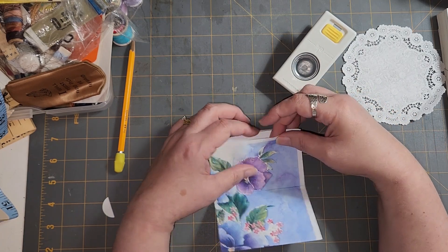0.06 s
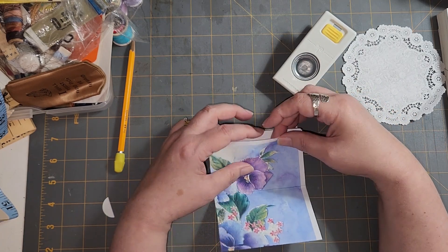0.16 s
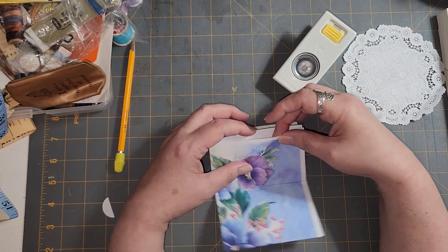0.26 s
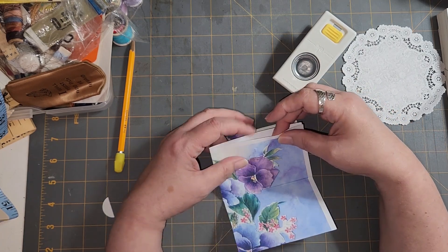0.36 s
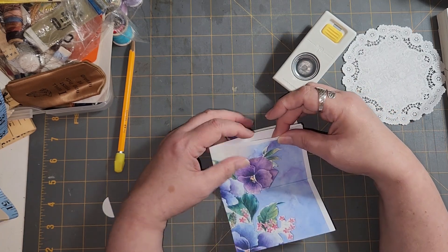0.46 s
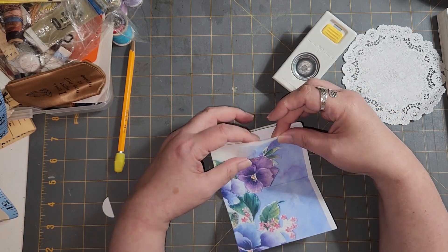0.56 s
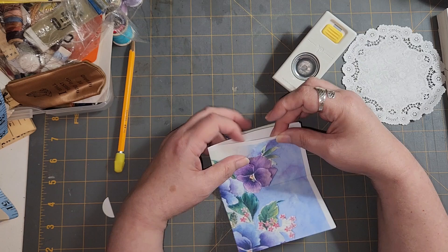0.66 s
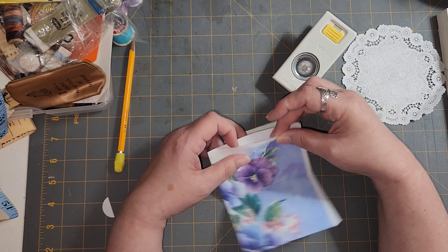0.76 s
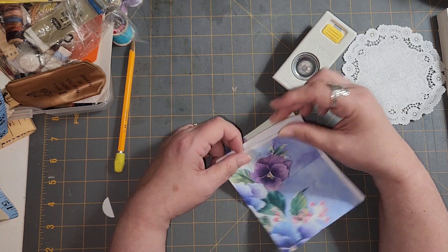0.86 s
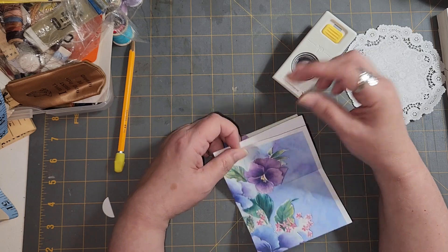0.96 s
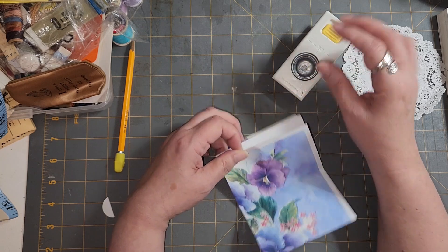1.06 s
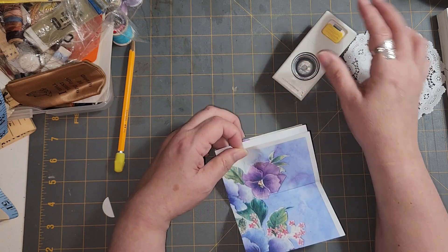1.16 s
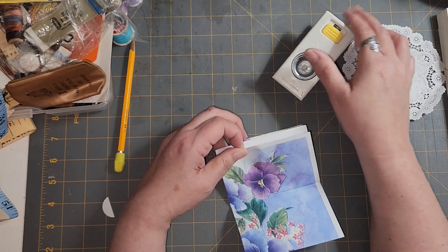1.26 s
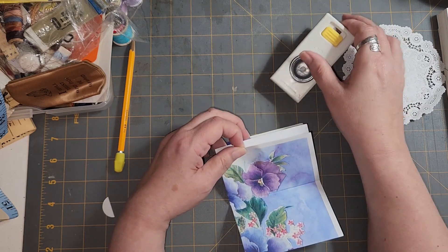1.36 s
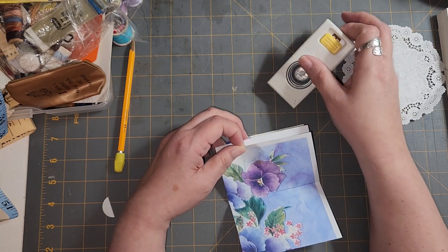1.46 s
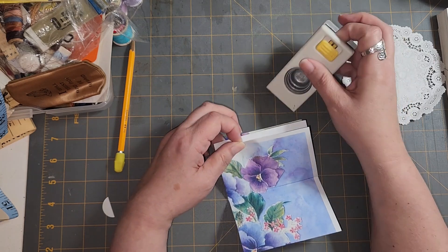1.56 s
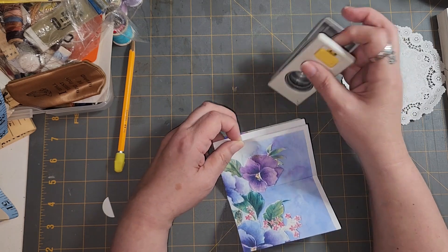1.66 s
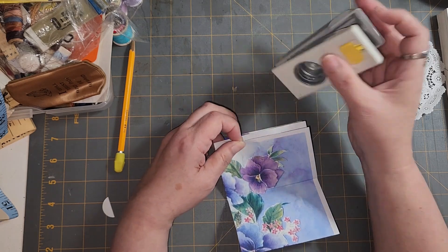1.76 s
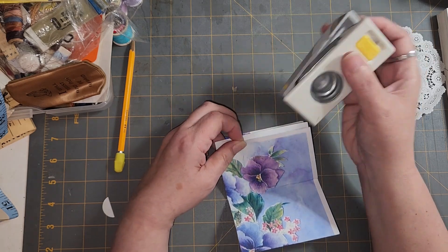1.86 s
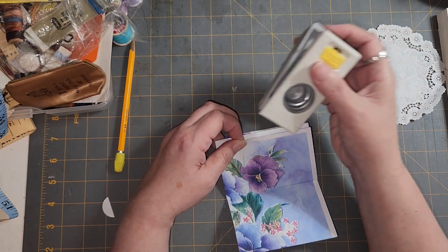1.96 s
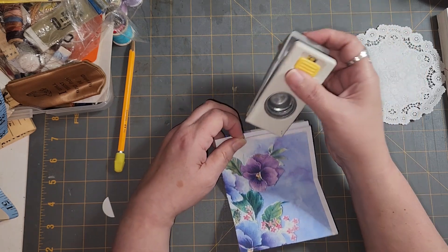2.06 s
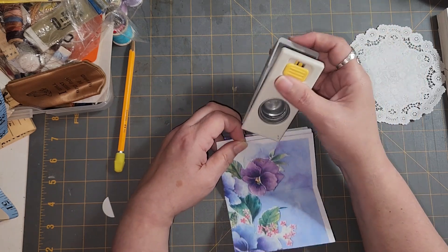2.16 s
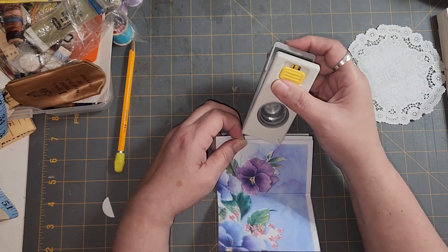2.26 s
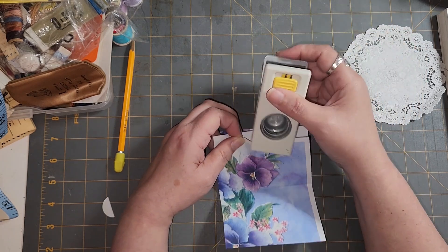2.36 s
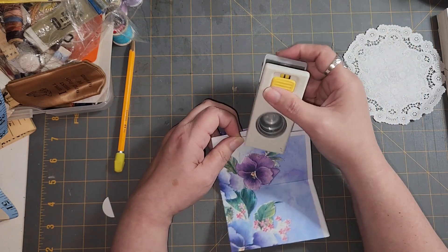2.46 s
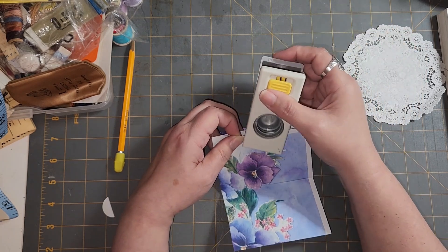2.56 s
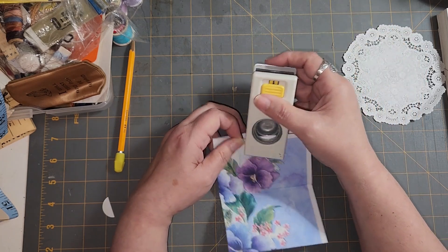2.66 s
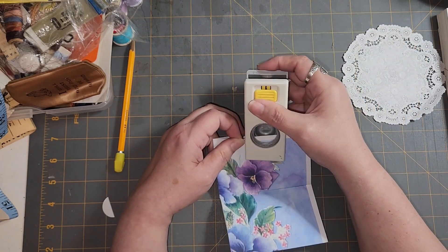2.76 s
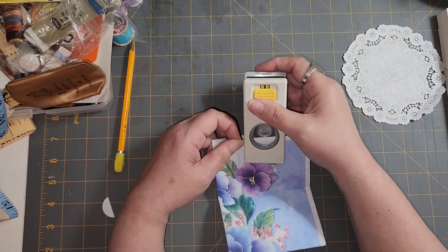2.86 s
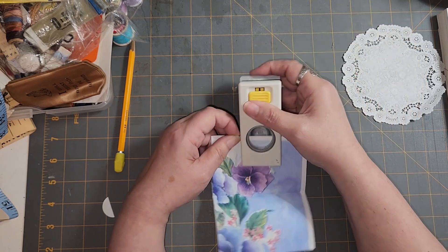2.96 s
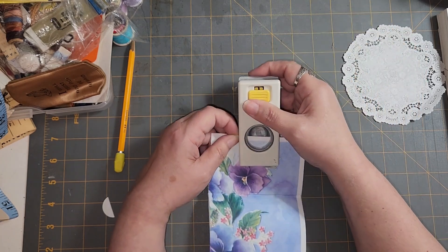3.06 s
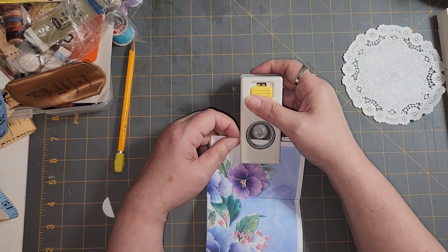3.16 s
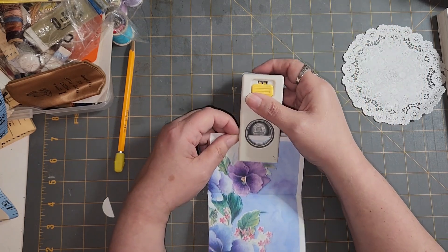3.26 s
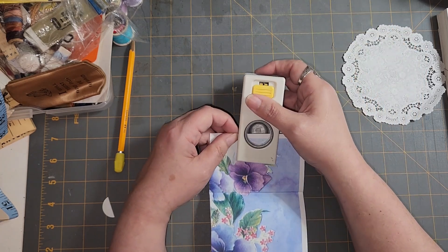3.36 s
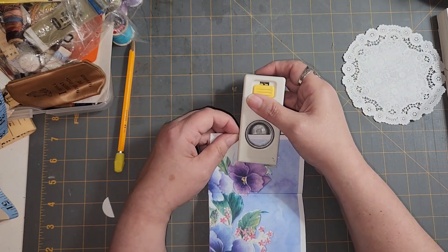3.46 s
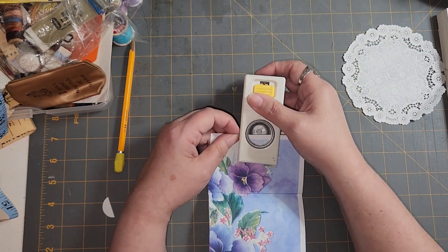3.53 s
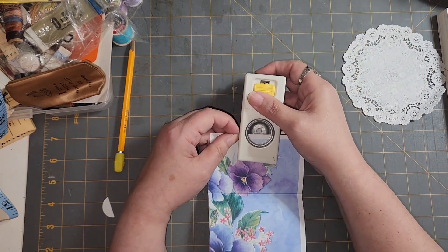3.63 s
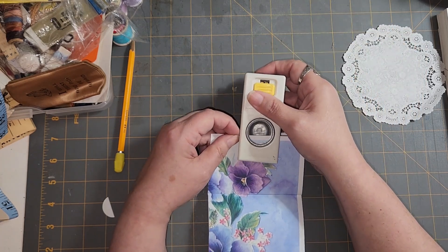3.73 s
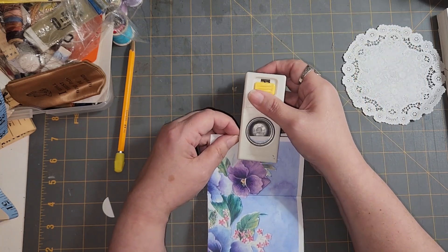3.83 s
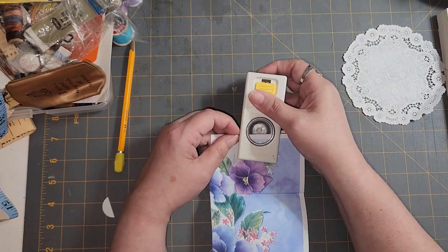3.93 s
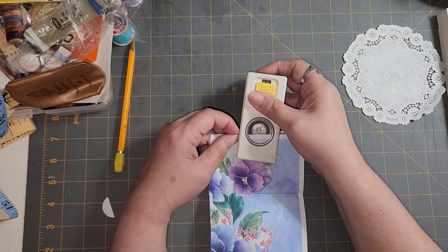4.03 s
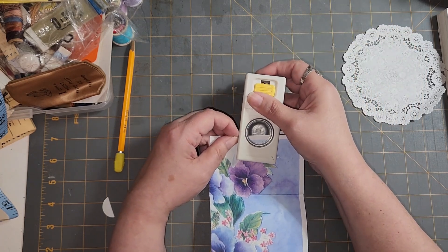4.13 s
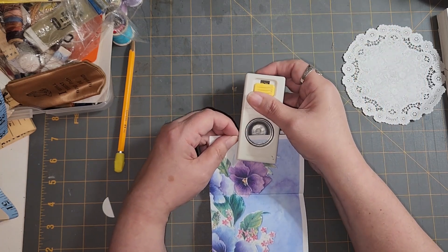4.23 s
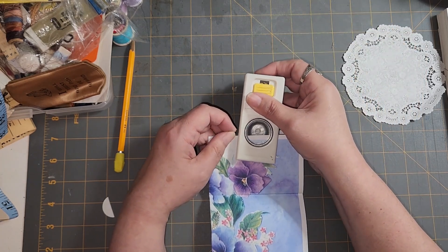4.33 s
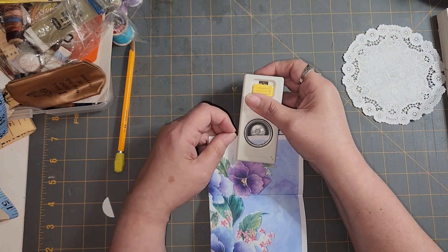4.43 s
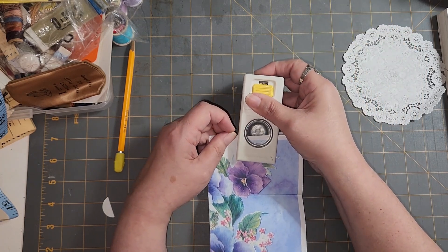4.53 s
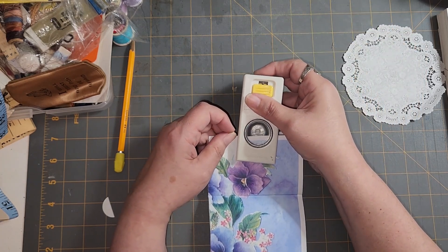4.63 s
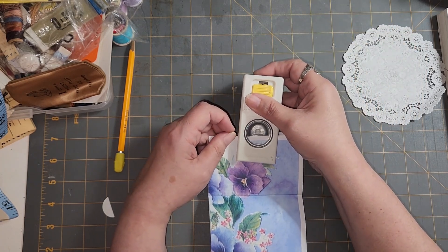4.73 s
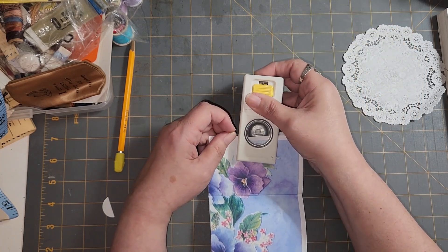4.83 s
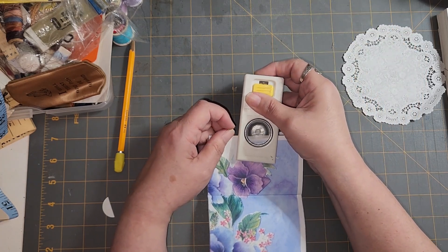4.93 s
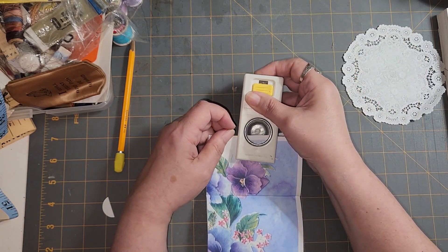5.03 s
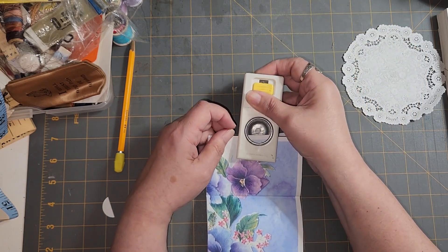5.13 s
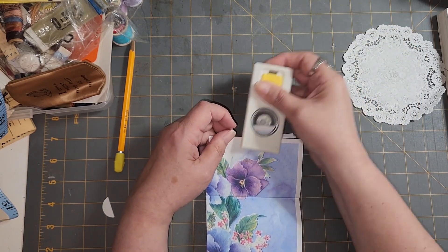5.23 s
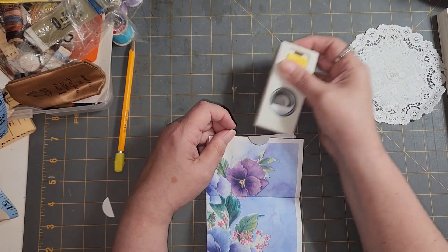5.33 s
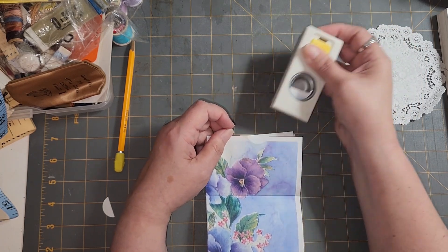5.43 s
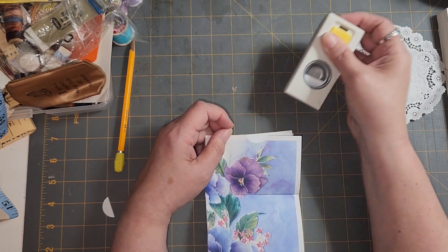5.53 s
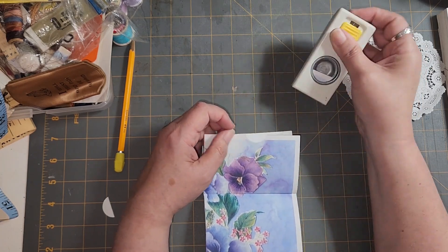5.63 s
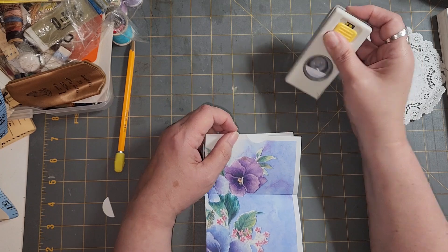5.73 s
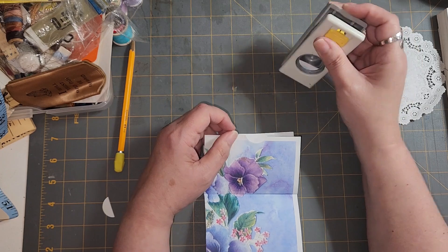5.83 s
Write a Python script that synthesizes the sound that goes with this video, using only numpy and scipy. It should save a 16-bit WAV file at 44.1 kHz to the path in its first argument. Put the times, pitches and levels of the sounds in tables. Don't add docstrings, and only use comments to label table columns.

```python
import sys
import numpy as np
from scipy import signal
from scipy.fft import rfft, irfft, next_fast_len
from scipy.io import wavfile
from scipy.ndimage import uniform_filter1d, map_coordinates

SR = 44100
rng = np.random.default_rng(int(sys.argv[2]) if len(sys.argv) > 2 else 0)


def ratio(d):
    e = np.asarray(d, float) / 20
    return 10 ** e


def persist_wave(psi):
    counts = np.round(np.clip(psi, -1, 1) * 32767).astype(np.int16)
    wavfile.write(sys.argv[1], SR, np.atleast_2d(counts).T)


N = 259749
T = np.arange(SR // 4) / SR
CLOCK = np.arange(N) / SR


def unit(x):
    return x / np.sqrt(np.mean(x ** 2) + 1e-20)


def peak_one(x):
    return x / np.abs(x).max()


def along(points, hz):
    f, v = np.transpose(points)
    return np.interp(np.log(hz + 1), np.log(f + 1), v)


def curve(rows):
    s, v = np.transpose(rows)
    return np.interp(CLOCK, s, v)


def wobble(rate_hz):
    knots = rng.standard_normal(int(N * rate_hz / SR) + 4)
    return map_coordinates(knots, [np.arange(N) * rate_hz / SR])


def filtered(x, response):
    n = x.shape[-1]
    m = next_fast_len(n + 4096)
    return irfft(rfft(x, m) * response(np.fft.rfftfreq(m, 1 / SR)), m)[..., :n]


# (frequency [Hz], correlation [0-1])
LIKENESS = [(100, 0.87), (500, 0.27), (1500, 0.49), (4000, 0.093), (9000, 0.052), (15000, 0)]


def rush(spectrum, grain=1, patchy_db=0):
    def mid_side(hz):
        turn = np.arccos(np.clip(along(LIKENESS, hz), -1, 1)) / 2
        return ratio(along(spectrum, hz)) * [np.cos(turn), np.sin(turn)]

    z = signal.stft(grain * rng.standard_normal((2, N)), nperseg=256)[2]
    field = uniform_filter1d(rng.standard_normal(z.shape[1:]), size=3, axis=0)
    field = uniform_filter1d(field, size=10, axis=1)
    pair = signal.istft(z * ratio(patchy_db * unit(field)), nperseg=256)[1][:, :N]
    mid, side = filtered(pair, mid_side)
    return unit(np.array([mid + side, mid - side]))


def resonant(peaks):
    def response(f):
        return sum((-1) ** k * ratio(db) * 1j * f * width / (hz * hz - f * f + 1j * f * width)
                   for k, (hz, width, db) in enumerate(peaks))
    return response


def ring(modes, scatter_db, attack_s, detune=0):
    tones = 0
    for hz, db, t60 in modes:
        strength, shift = rng.standard_normal(2)
        decay = ratio(db + scatter_db * strength - 60 * T / t60)
        tones = tones + decay * np.sin(2 * np.pi * hz * (1 + detune * shift) * T)
    return tones * (1 - np.exp(-T / attack_s)) * np.cos(np.pi / 2 * T / T[-1])


def add(out, s, db, sound):
    at = round(s * SR)
    out[..., at:at + len(T)] += ratio(db) * peak_one(sound)


# (frequency [Hz], density [dB per Hz])
AIR = [(12, -33.5), (20, 11.5), (91, 4.5), (182, -8), (241, -8), (293, -7), (678, -15), (1960, -17.5),
       (2670, -17), (3630, -16.5), (6360, -25), (8410, -31), (9670, -32.5), (15800, -35.5), (16050, -61)]


def background():
    pitch_hz = 236.6 + 1.51 * wobble(2.4)
    load = np.clip(np.minimum((CLOCK - 3.1) / 0.36 + 1, (3.75 - CLOCK) / 0.088), 0, 1)
    hum_db = -80.5 + 9.5 * load + 1.8 * wobble(18) + 1.3 * (1 - load) * wobble(0.98)
    hum = ratio(hum_db) * np.sin(2 * np.pi * np.cumsum(pitch_hz) / SR)
    return ratio(-66 + 0.66 * wobble(2.4)) * rush(AIR, ratio(0.73 * wobble(8.2)), patchy_db=1.4) + hum


# (time [s], pressure [dB])
REST = [(0, -67), (.45, -72.5), (.56, -76.5), (1, -62), (1.23, -83.5), (1.55, -71), (1.84, -78.5),
        (1.95, -67), (2.1, -71.5), (2.6, -60.5), (3.1, -60), (3.55, -71.5), (4.35, -67), (4.7, -73.5),
        (5.07, -69), (5.44, -87), (5.64, -71.5), (5.89, -76)]
# (middle [s], level [dB], half length [s])
STROKES = [(0.005, -64, 0.0078), (0.062, -59, 0.032), (0.153, -57, 0.028), (0.286, -59, 0.017),
           (0.325, -60.5, 0.018), (0.382, -53.5, 0.026), (0.422, -59.5, 0.018), (0.556, -66.5, 0.016),
           (0.64, -62.5, 0.0085), (0.687, -62, 0.021), (0.751, -61.5, 0.016), (0.798, -61.5, 0.034),
           (0.891, -43, 0.028), (0.968, -56.5, 0.037), (1.036, -58.5, 0.01), (1.095, -59.5, 0.026),
           (1.138, -54.5, 0.018), (1.19, -57, 0.022), (1.39, -65.5, .012), (1.453, -58.5, 0.02),
           (1.576, -63.5, 0.025), (1.771, -66, 0.014), (1.904, -61.5, 0.011), (1.968, -60.5, .012),
           (2.02, -63, 0.03),
           (2.188, -56, 0.028), (2.296, -46, 0.02), (2.42, -51.5, 0.028), (2.455, -48, 0.025),
          (2.52, -50, 0.019), (2.551, -49.5, 0.019), (2.698, -59, 0.021), (2.768, -52, 0.047),
          (2.846, -67, 0.014), (2.933, -54.5, 0.018), (3.013, -51, 0.027), (3.073, -46.5, 0.016),
          (3.11, -57, 0.011), (3.19, -49.5, 0.024), (3.356, -56, 0.023), (3.422, -62, 0.039),
          (3.736, -60, 0.016), (3.802, -62, 0.023), (3.963, -55, 0.01), (4.013, -53, 0.018),
          (4.144, -53, 0.027), (4.274, -53, 0.027), (4.443, -59.5, 0.075), (4.522, -55.5, 0.015),
          (4.606, -56.5, 0.026), (5.038, -52.5, 0.069), (5.146, -70, 0.052), (5.26, -65, .028),
          (5.327, -56.5, 0.033), (5.71, -66.5, 0.031)]
# (time [s], firmness [0-1])
CLAMP = [
    (0, 0),
    (.15, 0),
    (1.2, 0),
    (2.2, 0.25),
    (3.3, 0.38),
    (3.75, 0.84),
    (4.3, .7),
    (5.1, 0.87),
    (5.35, 0.4),
    (5.89, 0.18),
]
# (frequency [Hz], density [dB per Hz])
BODY = [(290, -52.5), (500, -15.5), (770, -17.5), (999, -7), (1200, -7.5), (1790, 0.5), (2460, -3.5),
        (2780, -12.5), (3100, -9), (5500, -10.5), (7150, -49), (12100, -120)]
# (frequency [Hz], density [dB per Hz])
HISS = [(1200, -73), (2470, -5.5), (4200, -4), (5400, -3.5), (6300, -3), (7400, -4.5), (8360, -13),
        (9350, -2.5), (11800, -5.5), (15750, -11), (16050, -43.5), (17000, -48)]


def rubbing():
    rest_power = ratio(curve(REST)) ** 2
    stroke_power = np.zeros(N)
    for s, db, half_s in STROKES:
        near = slice(max(round((s - 4 * half_s) * SR), 0), round((s + 4 * half_s) * SR))
        stroke_power[near] += ratio(db) ** 2 * np.exp(-np.abs((CLOCK[near] - s) / half_s) ** 2.37)
    clamp = curve(CLAMP)
    rest_muffle, stroke_muffle = ratio(-18.5 * clamp), ratio(-16.5 * clamp)
    hiss = ratio(3) * np.sqrt(rest_power * rest_muffle ** 2 + stroke_power * stroke_muffle ** 2)
    catches = uniform_filter1d(rng.exponential(1, N) ** 4, size=40)
    grain = ratio(1.5 * wobble(40) + 1.0 * wobble(160)) * (1 + 0.13 * unit(catches))
    body = np.sqrt(rest_power + stroke_power) * rush(BODY, grain, patchy_db=2.5)
    return body + hiss * rush(HISS, grain, patchy_db=1.35)


# (time [s], peak [dB], centre [Hz], t60 [s])
THUDS = [(0.003, -49, 810, 0.023), (0.02, -55, 300, 0.072), (0.229, -59, 805, 0.018),
         (1.391, -54, 200, .06), (1.42, -55, 259, .08), (1.468, -37, 400, 0.046), (1.487, -42, 546, 0.089),
         (1.511, -55, 600, .08), (1.59, -58, 298, 0.089), (1.682, -54.5, 500, 0.034),
         (2.3, -48.5, 493, 0.082), (2.447, -37, 760, 0.15), (2.62, -48.5, 550, 0.065),
         (3.156, -58, 596, .05), (4.243, -43.5, 550, 0.049), (4.28, -45, 545, 0.079),
         (4.873, -33.5, 592, 0.092), (4.964, -41.5, 600, .05), (5.002, -39, 597, .06),
         (5.014, -36, 597, 0.09)]


def thuds():
    out = np.zeros((2, N + SR))
    for s, db, hz, t60 in THUDS:
        envelope = ratio(-60 * T / t60) * (1 - np.exp(-T / 0.00071))
        burst = envelope * rng.standard_normal((2, len(T)))
        left, other = filtered(burst, lambda f: resonant([(hz, .9 * hz, 0)])(f) ** 2)
        add(out, s, db, np.array([left + 0.36 * other, 0.68 * (left - 0.73 * other)]))
    return out[:, :N]


# (frequency [Hz], width [Hz], level [dB])
PAPER = [(546, 410, -13.5), (917, 330, -5.5), (1300, 79, 2.5), (2350, 750, -3), (2870, 253, -2.5),
         (4600, 1460, -11.5), (5900, 1100, -10.5)]


def contacts(rows, modes, own_width, note_db, paper_db, modes_db, attack_s, lean_db, detune, scatter_db):
    out = np.zeros((2, N + SR))
    for s, db, hz, treble_db, t60 in rows:
        decay = ratio(-60 * T / np.clip(t60, .004, .2)) + 0.32 * ratio(-60 * T / 0.0072)
        burst = decay * (1 - np.exp(-T / attack_s)) ** 2 * rng.standard_normal((3, len(T)))

        def struck(f):
            own = resonant([(hz, own_width * hz, 0)])(f)
            return (own + ratio(paper_db) * resonant(PAPER)(f)) / (1 + 1j * f / 6000)

        body = peak_one(filtered(burst[0], struck))
        body = body + ratio(modes_db) * ring(modes, scatter_db, attack_s, detune)
        body = body + ratio(note_db) * ring([(hz, 0, 1.44 * t60)], 0, 0.0021)
        spit = peak_one(filtered(burst[1:] + 0.099 * burst[0], lambda f: ratio(along(HISS, f))))
        lean = ratio([[lean_db / 2], [-lean_db / 2]])
        add(out, s, db, body * lean + ratio(treble_db + 7) * spit)
    return out[:, :N]


# (time [s], peak [dB], ring [Hz], treble [dB])
CRACKLES = [(0.011, -41.5, 1140, -23), (0.02, -39, 990, -30), (0.029, -46, 950, -25),
            (0.059, -48, 990, -20), (0.112, -51, 1000, -20), (0.112, -48, 2450, -20),
            (0.265, -46, 3050, -12), (0.305, -52, 1550, -20), (0.36, -47, 1100, -15), (0.37, -45, 1970, -8),
            (0.381, -47, 2000, -10), (0.42, -43.5, 1750, -15), (0.425, -43.5, 1040, -25),
            (0.594, -57, 1920, -13), (0.728, -50, 1960, -15), (0.856, -48, 2030, -4),
            (1.124, -48, 3080, -6), (1.18, -47, 1570, -12), (2.285, -35, 2100, -12),
            (2.293, -36, 1300, -15), (2.377, -53, 1970, -10), (2.395, -48, 2640, -4),
            (2.422, -30, 4600, -12), (2.495, -36.5, 1200, -15), (2.668, -49, 1900, -12),
            (2.772, -38, 1700, -25), (2.982, -47, 2090, -9), (3.006, -39.5, 1850, -20),
            (3.18, -40, 1700, -15), (3.337, -49, 1190, -15), (3.356, -43, 2060, -7),
            (3.407, -53, 1140, -12), (3.494, -48, 1300, -13), (4.11, -47, 2100, -3),
            (4.249, -28, 2040, -12), (4.269, -41, 4100, 2), (4.285, -35, 4060, -5), (4.679, -51, 990, -24)]
# (time [s], peak [dB], ring [Hz], treble [dB], burst t60 [s])
KNOCKS = [(0.019, -30, 2070, -54, 0.032), (2.163, -29.5, 1840, -14, 0.003), (2.164, -35, 1170, -32, 0.025),
          (2.262, -32.5, 1760, -18, 0.046), (2.446, -11.5, 1400, -5, 0.026),
          (2.544, -27.5, 2000, -34, 0.039), (2.58, -31.5, 930, -34, 0.0098),
          (2.619, -31.5, 1170, -16, 0.033), (2.837, -23.5, 1560, -41, 0.05),
          (3.065, -33.5, 4200, -9, 0.048), (3.155, -23, 2226, -14.5, 0.021), (4.242, -26, 1210, -9, 0.036),
          (4.279, -25, 1160, -12.5, 0.03), (4.433, -20, 2250, -17.5, 0.017), (4.434, -25, 830, -19, 0.014)]
# (time [s], peak [dB], ring [Hz], treble [dB])
FLICKS = [(0.111, -43, 1730, -21), (0.267, -48.5, 1560, -15), (0.374, -39.5, 3430, -17),
          (0.633, -42.5, 2550, 0.5), (0.753, -42.5, 1920, -9), (1.01, -36, 1150, -32),
          (1.245, -50, 1870, -26), (1.299, -46, 2280, 2), (1.335, -55, 1180, -30), (1.363, -39.5, 1840, -6),
          (1.467, -40, 2780, -25), (2.304, -33.5, 2180, -19), (2.42, -29, 1870, -5.5),
          (1.817, -51, 1840, 4), (2.748, -36, 1110, -24), (3.198, -38.5, 2410, 3), (3.379, -43.5, 1180, 7),
          (4.314, -37.5, 885, -40), (4.328, -38.5, 1580, -22), (4.415, -40.5, 1000, -13),
          (4.59, -42, 1930, -28), (5.107, -42.5, 1380, 7), (5.188, -46.5, 4200, -5),
          (5.366, -41.5, 1920, 23)]
# (time [s], peak [dB], ring [Hz], treble [dB])
CREAKS = [(1.487, -36.5, 2860, -12.5), (1.562, -42, 3440, -19), (1.697, -46.5, 4500, -3.5),
          (2.993, -37.5, 1810, -20), (3.27, -46.5, 5000, -1), (3.489, -46, 1180, -23),
          (3.737, -53, 1210, -19), (3.862, -47.5, 2100, -13), (3.942, -48, 1250, -6),
          (3.999, -37, 4300, -26), (4.013, -43, 4300, -35), (4.118, -36.5, 2040, -13),
          (4.148, -35.5, 1900, -13), (4.36, -44, 1240, -14), (4.736, -48.5, 1140, -5),
          (5.195, -44.5, 1180, -12)]
# (frequency [Hz], level [dB], t60 [s])
LOOSE = [(1536, -7, 0.064), (1920, -5.5, 0.086), (2181, -7, 0.05), (2738, -8, 0.037), (4200, -1.5, 0.036),
         (6750, -26, 0.018)]


def ticks():
    rows = KNOCKS + [(*row, 0.02) for row in FLICKS]
    rows = rows + [(*row, 0.048) for row in CREAKS] + [(*row, 0.017) for row in CRACKLES]
    return contacts(rows, LOOSE, own_width=0.14, note_db=-24, paper_db=-8.5, modes_db=-16.5,
                    attack_s=0.00039, lean_db=1.4, detune=0.0794, scatter_db=5.5)


# (time [s], peak [dB], main note [Hz])
TAPS = [(0.229, -55.5, 297), (1.608, -44, 147), (1.679, -50.5, 239), (2.163, -47.5, 480),
        (2.262, -51.5, 380), (2.445, -45.5, 359), (2.54, -47, 465), (2.578, -51, 485), (2.838, -44.5, 482),
        (3.488, -58.5, 278), (4.359, -49.5, 109)]
# (time [s], peak [dB], main note [Hz])
BUMPS = [(1.354, -54, 103), (1.392, -32, 102), (1.419, -39, 82), (1.467, -30, 122), (1.487, -23, 254),
         (1.509, -37, 213.3), (1.528, -40.5, 227.5), (1.558, -40.5, 227), (3.993, -49, 100),
         (4.166, -44.5, 113), (4.241, -38.5, 113), (4.28, -37.5, 110.4), (4.872, -32, 119),
         (4.964, -32, 125), (5.003, -34.5, 93), (5.017, -31.5, 98)]
# (time [s], peak [dB], note [Hz], t60 [s])
SWAYS = [
    (0.902, -68.5, 366, 0.33),
    (1.002, -64.5, 361, 0.23),
    (1.102, -75, 354, 0.21),
    (4.271, -52, 50, 0.94),
    (4.88, -44.5, 50, 0.41),
    (5.03, -39.5, 93, 0.27),
    (5.031, -46.5, 51.6, 0.58),
]
# (frequency [Hz], level [dB], t60 [s])
DESK = [(50, -24, 0.35), (98.6, -10.5, 0.44), (165.4, -8, 0.28), (236, -1, 0.15), (331.4, -1, 0.15),
        (458, -6.5, 0.16), (704, -24.5, 0.12), (850, -41, 0.074)]


def desk():
    out = np.zeros(N + SR)
    pushes = []
    for s, db, hz in BUMPS:
        t60 = 0.22 * np.exp(-0.3 * (-27 - db))
        pushes.append((s, db, hz, min(t60, 0.5)))
    for s, db, hz, t60 in pushes + [(*row, 0.18) for row in TAPS] + SWAYS:
        reach = [(f, level - 6 * abs(np.log2(f / hz)), life) for f, level, life in DESK]
        noise = ratio(-60 * T / t60) * rng.standard_normal(len(T))
        thud = peak_one(filtered(noise, lambda f: resonant([(1.3 * hz, 1.2 * hz, 0)])(f) ** 2))
        spot = ring([(hz, 0, 1.18 * t60), (1.096 * hz, 3, .035), (2.8 * hz, -12, .04)], 0, 0.00096)
        tone = spot + ratio(-3.0) * ring(reach, 4.4, 0.0023, detune=0.038)
        add(out, s, db, tone + ratio(-12.0 + 9.7 * np.log2(hz / 200)) * thud)
    return out[:N]


def stand():
    out = np.zeros(N + SR)
    for s, db, hz, t60 in SWAYS:
        add(out, s, db, ring([(hz, 0, t60)], 0, 0.0051))
    return out[:N]


# (time [s], level [dB], note [Hz], t60 [s])
HOLLOW = [
    (1.332, -49.5, 1180, 0.041),
    (4.88, -46.5, 1210, 0.39),
    (5.02, -53, 1224, 0.76),
    (5.1, -57, 1290, 0.48),
]


def hollow():
    out = np.zeros(N)
    for s, db, hz, t60 in HOLLOW:
        since = np.clip(CLOCK - s, 0, None)
        narrow = filtered(rng.standard_normal(N), lambda f: resonant([(hz, 200, 0)])(f) ** 2)
        rough = unit(narrow) * ratio(3 * wobble(70))
        out += ratio(db - 60 * since / t60) * (1 - np.exp(-since / .002)) * rough
    return out * ratio([[.8], [-.8]])


# (time [s], peak [dB], ring [Hz], treble [dB])
RATTLE = [(1.488, -43, 2740, -20), (1.73, -52, 2770, -17), (1.732, -55, 4200, -14), (3.59, -51, 1940, -16),
          (5.108, -49, 6300, -15), (5.197, -57, 6400, -21), (1.863, -46.5, 4200, -2),
          (1.863, -54, 1400, -10), (1.899, -41.5, 1490, -7), (1.902, -34, 4240, 5), (2.003, -37, 4040, 6),
          (2.004, -44.5, 1600, 1), (5.446, -52, 1380, -30), (5.515, -51, 1400, -10),
          (5.732, -39.5, 1450, 5), (5.775, -41, 2910, -2)]
# (time [s], peak [dB])
SHIVER = [(5.795, -39.5), (5.808, -46), (5.817, -41), (5.827, -41), (5.832, -35.5), (5.843, -39),
          (5.859, -36), (5.864, -45.5), (5.871, -44.5), (5.875, -43), (5.885, -46)]


def rattle():
    fall_s, edge_hz, flat_hz, dulls_db_per_s = 5.823, 2840, 2143, 264
    shiver = []
    for s, db in SHIVER:
        treble_db = -10.5 - dulls_db_per_s * (s - SHIVER[0][0])
        shiver.append((s, db, flat_hz if s > fall_s else edge_hz, treble_db))
    return contacts([(*row, 0.021) for row in RATTLE + shiver], LOOSE, own_width=0.029, note_db=-6.5,
                    paper_db=-59.0, modes_db=-6, attack_s=0.00074, lean_db=2.4, detune=0.0063, scatter_db=4)


# (time [s], peak [dB], ring [Hz], treble [dB], burst t60 [s])
SNAPS = [(4.872, -22.5, 4150, -11, .014), (4.873, -14.5, 1180, -14, 0.025), (4.875, -18.5, 2035, -5, .018),
         (4.881, -26, 1300, -25, 0.02), (4.896, -35.5, 1250, -21, .04), (4.963, -22, 1150, -13, 0.02),
         (4.965, -36.5, 4150, -11.5, .03), (4.967, -40.5, 2250, -7, .03), (5.0, -27, 6000, -1.5, 0.015),
         (5.001, -20.5, 1370, -10.5, .015), (5.0035, -11.5, 1300, -16.5, 0.031),
         (5.004, -23.5, 2600, -9.5, .015), (5.005, -25, 4150, -7.5, .016), (5.0135, -13.5, 1199, -9, 0.018),
         (5.014, -28.5, 2600, -9, .02), (5.015, -27.5, 3900, -10, .02), (5.025, -32, 1196, -13, .03)]
# (frequency [Hz], level [dB], t60 [s])
SHELL = [(922, -16, 0.08), (1180, -17, 0.15), (1303, -16, 0.08), (1233, -15.5, 0.06), (1650, -13, 0.06),
         (2035, -8.5, 0.06), (2600, -9, .04), (3100, -5, 0.049), (4150, -2.5, 0.079), (4900, -2.5, .05),
         (6050, -9, 0.043)]


def snap():
    return contacts(SNAPS, SHELL, own_width=0.12, note_db=5, paper_db=-14.5, modes_db=-22.0,
                    attack_s=0.00071, lean_db=1.9, detune=0.04, scatter_db=3.5)


# (frequency [Hz], t60 [s])
ROOM = [(300, 0.3), (1300, 0.16), (4000, 0.16), (12000, 0.16)]


def room(x):
    out = np.zeros((2, N + SR))
    hop = SR // 3
    for at in range(0, N, hop):
        hz, t, z = signal.stft(rng.standard_normal((2, SR // 2)), SR, nperseg=256)
        tail = signal.istft(z * ratio(-60 * t / along(ROOM, hz)[:, None]), SR, nperseg=256)[1]
        wet = signal.fftconvolve(x[:, at:at + hop], tail / np.linalg.norm(tail[0]), axes=1)
        out[:, at + 200:at + 200 + wet.shape[1]] += wet
    return out[:, :N]


def scene():
    near = ticks() + rattle()
    snaps = snap()
    boom = desk() + stand()
    answer = room(ratio(-6.5) * near + ratio(-7.5) * snaps + ratio(-20) * boom)
    return background() + rubbing() + thuds() + near + boom + hollow() + snaps + answer


def band_limit(x):
    return signal.sosfilt(signal.butter(12, 16990, fs=SR, output="sos"), x)


def record(dry):
    def band(f):
        return (1j * f / (1j * f + 35)) ** 2 / (1 + (f / 16100) ** 60)
    return band_limit(filtered(dry, band))


dry = scene()
out = record(dry)
persist_wave(out)
```